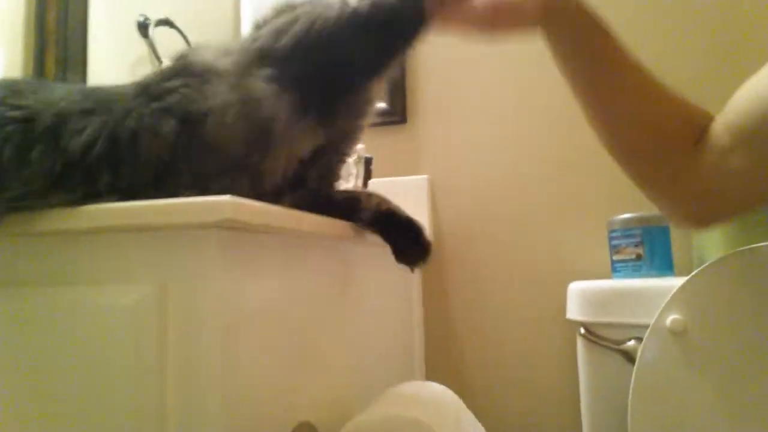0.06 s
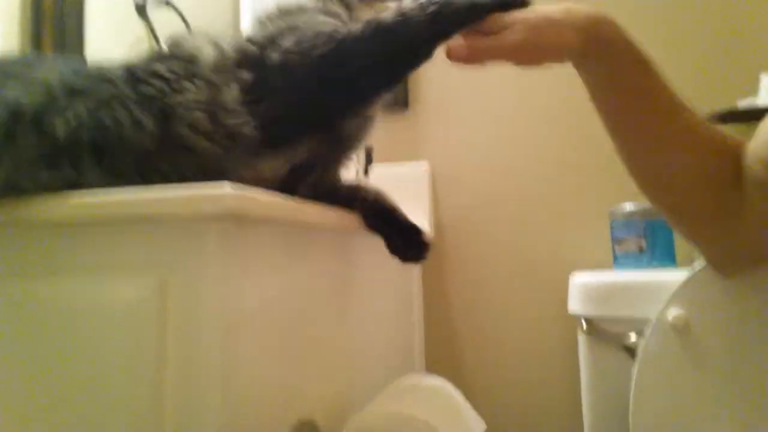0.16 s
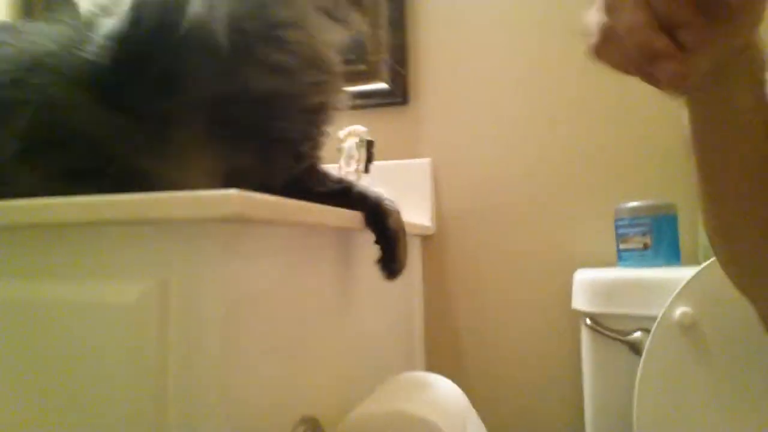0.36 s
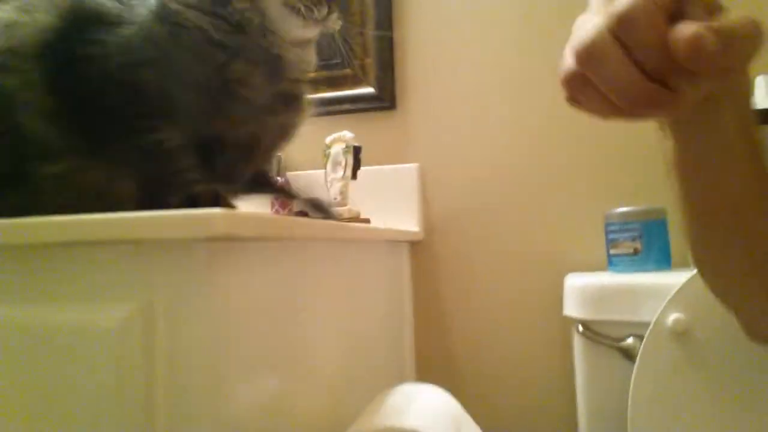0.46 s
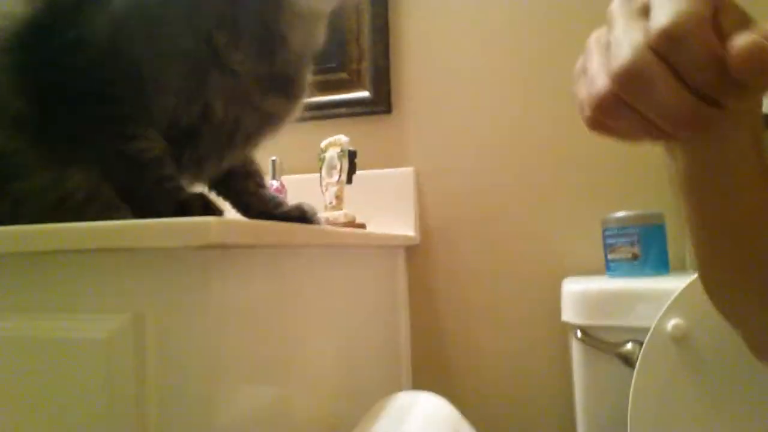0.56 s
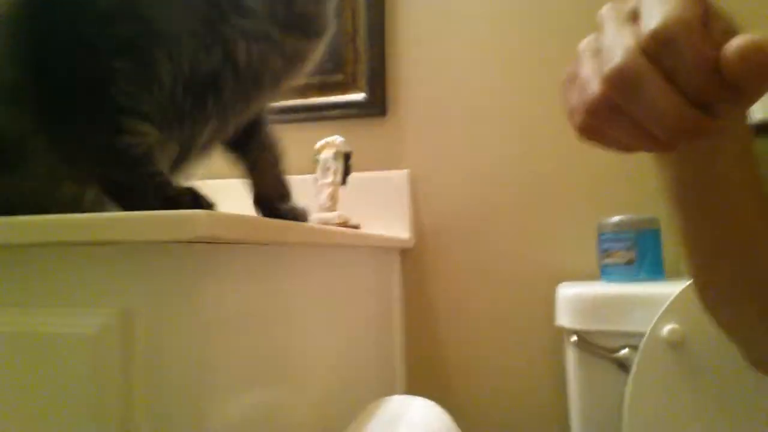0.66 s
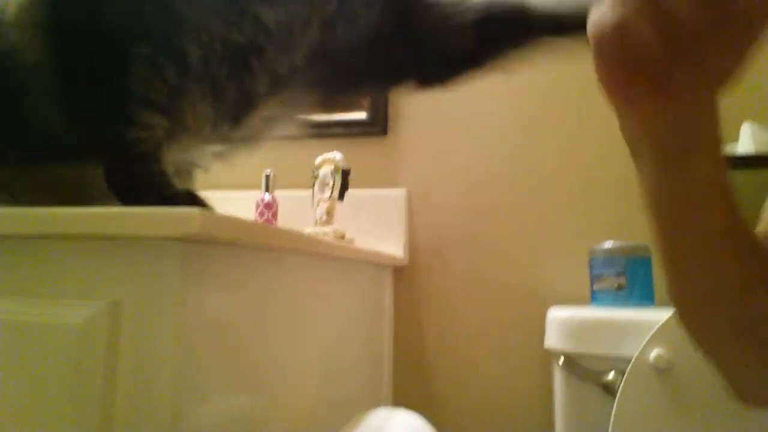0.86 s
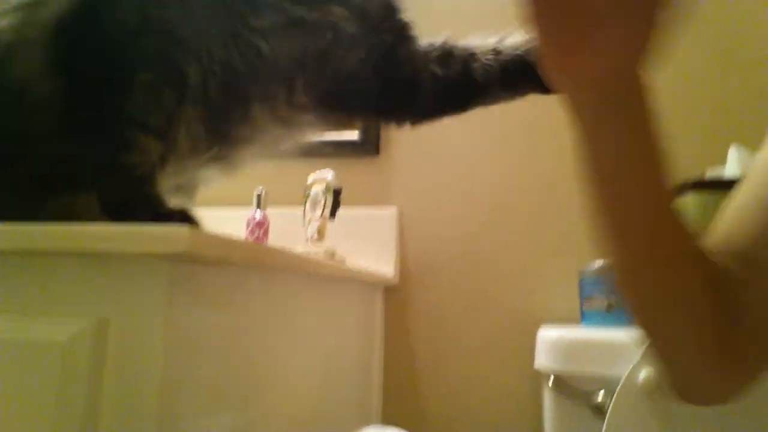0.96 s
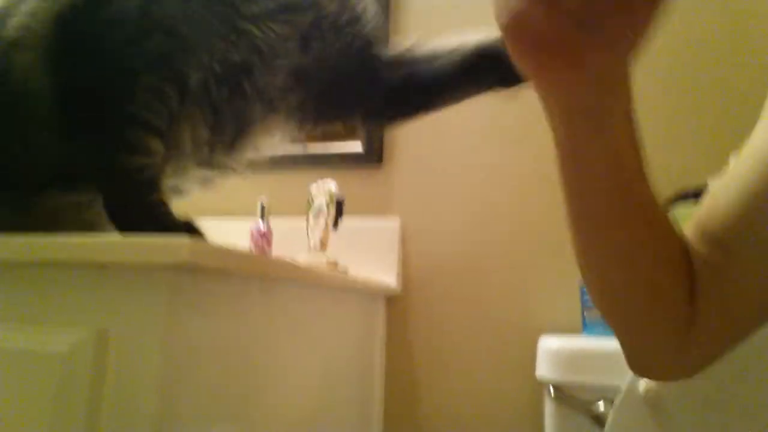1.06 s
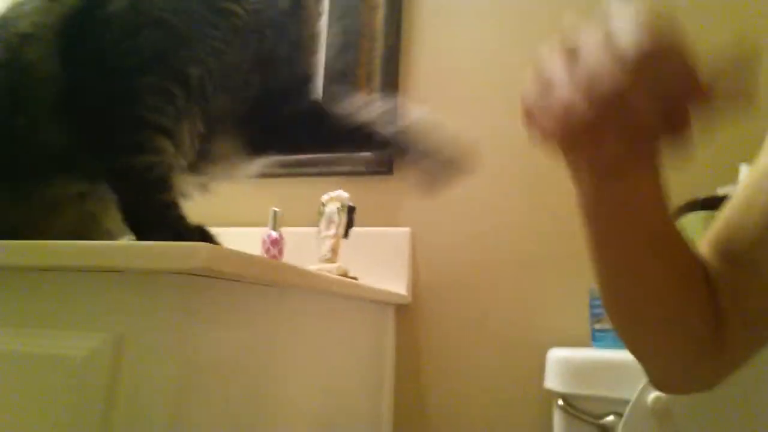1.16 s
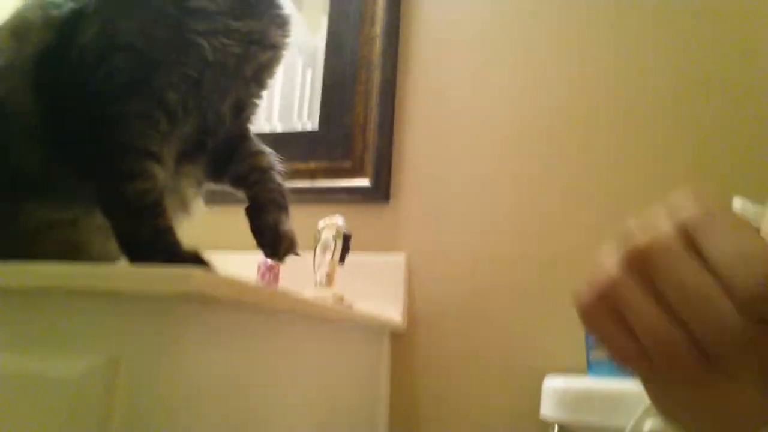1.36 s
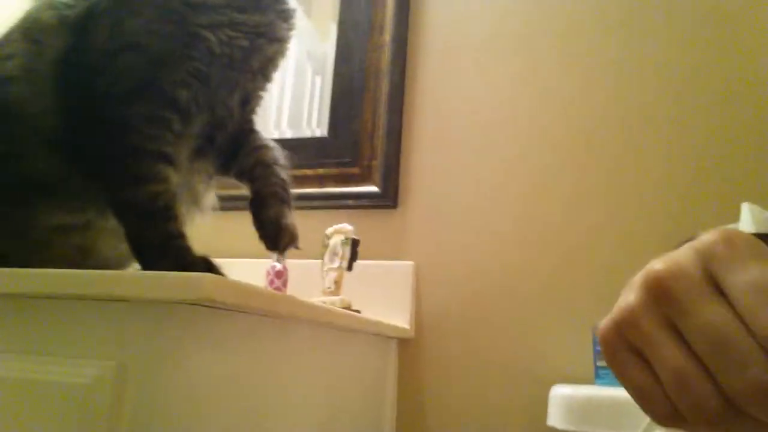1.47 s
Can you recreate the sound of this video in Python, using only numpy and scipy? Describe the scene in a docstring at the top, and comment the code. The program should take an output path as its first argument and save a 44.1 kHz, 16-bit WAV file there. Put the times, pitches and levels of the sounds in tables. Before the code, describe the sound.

A hard, hollow knock with a quick clatter as a cat swats in a bathroom.

```python
"""A cat spars with a hand on a bathroom cabinet, heard from a phone's stereo microphone in the same room.
First a claw ticks and a paw lands; then something hollow knocks hard against the cabinet and chatters,
and the small hard room rings with it. Near one second a soft swat follows, among padded steps that make
the cabinet boom, rustling fur and a sliding paw. Ventilation hums and hisses from start to end."""
import sys
import numpy as np
from scipy import signal
from scipy.fft import rfft, irfft
from scipy.io import wavfile

SR = 44100
rng = np.random.default_rng(int(sys.argv[2]) if len(sys.argv) > 2 else 0)


def master_out(mix):
    """Clip the mix to full scale and print it as 16-bit PCM to the path in sys.argv[1]."""
    frames = np.transpose(np.atleast_2d(mix))
    ceiling = np.clip(frames, -1, 1)
    pcm = np.round(ceiling * 32767).astype(np.int16)
    wavfile.write(sys.argv[1], SR, pcm)


N = 66150
T = np.arange(N) / SR
HZ = np.maximum(np.arange(N // 2 + 1) * SR / N, 1)
ALIKE_BELOW_HZ = 596  # below this, both sides of the microphone hear much the same


def knock():
    """A hollow body hits the cabinet: each contact feeds its modes and sets off a dense clatter."""
    # contacts, the loudest three being the knock: t/s, ring level/dB, clatter level/dB
    contacts = [(.2345, -18, -47), (.283, -25.5, -33), (0.332, 2, 2.5), (.3495, -10.5, -2),
                (.3645, -7, -2.5), (0.976, -32.5, -46)]
    # modes of the hollow body in the room: f/Hz, level/dB, t60/s, left-right/dB
    modes = [(256, -38, 0.52, 0.5), (336.5, -31, .33, 7), (362.4, -30.5, 0.32, 0.5), (443.4, -21, 0.35, 2),
             (732, -29.5, 0.43, 13.5), (790, -22.5, 0.4, -1), (832, -25.5, 0.49, 1), (854, -25, 0.18, -8),
             (876, -28, 0.23, 0), (930.6, -23.5, 0.36, -6.5), (1039, -29, 0.26, -2), (1029, -25, 0.28, 9.5),
             (1105, -35.5, 0.26, 6), (1356, -27, 0.27, 7), (1433, -22.5, 0.21, 0), (1510, -15, 0.074, 14),
             (1573, -35, 0.22, -21), (1873, -38, 0.21, 20), (2270, -32.5, 0.36, -6.5),
             (2653, -26.5, .25, 10), (2744, -35.5, .27, 9), (2896, -36, .22, 2), (3414, -41, 0.33, -19),
             (4200, -43, 0.25, -3), (5730, -30.5, 0.077, -5)]
    # spectrum of the dense resonances around them: f/Hz, level/dB
    clatter_colour = [(40, -35), (130, -7.5), (230, -33), (390, 2), (540, -15), (640, -12), (760, 1),
                      (980, -2.5), (1180, -7.5), (1530, 0.5), (1790, -15.5), (2020, -6), (2330, -11),
                      (2540, -10.5), (2720, -8), (3400, -13.5), (4500, -18), (6800, -22), (9500, -42),
                      (15000, -76)]
    phase_leads = 0.55 * rng.standard_normal(len(modes))
    start_turns = rng.random(len(modes))
    out = 0
    for (hz, db, t60, pan_db), lead, turn in zip(modes, phase_leads, start_turns):
        rise_s = 0.00088 + 1.6 / hz  # low modes swell more slowly
        swell = sum(undb(ring_db) * fall(start, rise_s, t60) for start, ring_db, _ in contacts)
        mic_phase = np.array([[lead], [-lead]]) * min(hz / ALIKE_BELOW_HZ, 2)
        tone = np.sin(2 * np.pi * (hz * T + turn) + mic_phase)
        out += undb(db) * pan(pan_db) * swell * tone
    for start, _, clatter_db in contacts:
        out += undb(clatter_db - 18.5) * room_burst(clatter_colour, start, rise_s=0.00093)
    return out


def paws():
    """Padded blows: the cabinet thumps and pings, the pad slaps, the fur brushes."""
    # blows: t/s, thump level/dB, slap level/dB, brush level/dB, brush left-right/dB
    blows = [(0.2312, -22.5, -53, -29, 2.5), (0.9731, -58.5, -41.5, -41, 3.5), (1.429, -62, -57, -61, -10)]
    # cabinet modes: f/Hz, level/dB, t60/s
    cabinet_modes = [(75, 0, 0.15), (113, 8.5, 0.085), (142, -2.5, .17), (1516, -10.5, 0.12)]
    # spectrum of the pad's slap: f/Hz, level/dB
    slap_colour = [(60, 5), (160, -10), (270, 0), (420, -0.5), (580, -11), (850, 3), (1300, -15.5),
                   (1650, -13), (2300, -26), (3500, -17), (15000, -40.5)]
    # spectrum of the fur's brush: f/Hz, level/dB
    brush_colour = [(300, 7), (1500, -13.5), (2800, -0.5), (4200, -4), (5800, 5.5), (7800, 1),
                    (10000, -15.5), (15000, -23)]
    rise_s, contact_s = 0.0032, 0.0053
    out = 0
    for start, thump_db, slap_db, brush_db, pan_db in blows:
        thump = sum(undb(db) * ring(start, hz, t60, rise_s=0.012) for hz, db, t60 in cabinet_modes)
        slap = room_burst(slap_colour, start, rise_s, direct_gain=undb(12.5), contact_s=contact_s)
        brush = room_burst(brush_colour, start, rise_s, direct_gain=undb(-0.5), contact_s=contact_s)
        out += undb(thump_db) * thump + undb(slap_db) * slap + undb(brush_db) * pan(pan_db) * brush
    return out


def claws():
    """Claws tick on a hard surface: a thin, bright snap and a short high ring."""
    # claw contacts: t/s, level/dB
    ticks = [(0.1882, -32.5), (0.2309, -40.5)]
    # spectrum of the snap: f/Hz, level/dB
    snap_colour = [(300, -13), (1500, -19), (2400, -2), (3600, -17), (5000, -9), (6600, 4), (8500, -15.5),
                   (15000, -27)]
    # modes a claw sets ringing: f/Hz, level/dB, t60/s
    modes = [(2380, -21, 0.11), (5670, -8, .1), (6400, -15, .2), (6780, -10, 0.4), (6800, -8, 0.41)]
    snap_s = 0.0013
    out = 0
    for start, tick_db in ticks:
        snap = room_burst(snap_colour, start, snap_s / 10, direct_gain=1, contact_s=snap_s)
        ping = 0
        for hz, db, t60 in modes:
            mic_phase = 2 * np.pi * rng.random((2, 1))
            ping += undb(db) * ring(start, hz, t60, snap_s, mic_phase)
        out += undb(tick_db) * pan(1.5) * (snap + ping)
    return out


def steps():
    """Padded footfalls stir only the lowest mode of the cabinet."""
    # paws set down: t/s, level/dB
    footfalls = [(0.907, -36.5), (1.007, -37), (1.06, -41), (1.147, -34), (1.203, -38), (1.36, -46),
                 (1.433, -37)]
    return sum(undb(db) * ring(start, hz=77.7, t60=0.28, rise_s=0.0089) for start, db in footfalls)


def clicks():
    """Tiny dry clicks as the cat moves; they sound close, with little room around them."""
    # clicks: t/s, level/dB
    events = [(.313, -49), (0.545, -38), (.8985, -62), (1.089, -41.5), (1.152, -48), (1.2163, -40.5)]
    # spectrum of a click: f/Hz, level/dB
    colour = [(500, -19), (2500, -8), (4200, 11), (7000, 7), (11000, -1), (15000, -5)]
    rise_s = 0.0009
    envelope = 0
    for start, db in events:
        direct = fall(start, rise_s, t60=0.018)
        room_tail = undb(-29) * fall(start, rise_s, t60=0.2)
        envelope += undb(db) * (direct + room_tail)
    return envelope * noise(undb(curve(colour)))


def shifting():
    """Fur rubs and the cabinet rumbles each time the cat shifts its weight."""
    # movements: middle t/s, half length/s, fur level/dB, rumble level/dB
    moves = [(0.008, 0.025, -49.5, -70), (0.077, 0.025, -42.5, -48.5), (0.115, 0.063, -44.5, -55),
             (.3, 0.11, -51, -48), (0.562, 0.066, -46.5, -43.5), (1.054, 0.03, -65, -48.5),
             (1.16, 0.066, -52.5, -63), (1.272, 0.12, -57, -57)]
    # spectrum of rubbing fur: f/Hz, level/dB
    fur_colour = [(100, -8), (280, -1), (800, -4.5), (1500, -12.5), (2500, -7.5), (4000, -12), (7300, -9),
                  (10000, -20), (15000, -27)]
    # spectrum of the cabinet's rumble: f/Hz, level/dB
    rumble_colour = [(22, -0.5), (48, -8), (78, -1), (115, -6.5), (160, 5.5), (300, -41), (900, -45)]
    fur = noise(undb(curve(fur_colour)))
    rumble = noise(undb(curve(rumble_colour)))
    return sum(hump(middle_s, half_s) * (undb(fur_db) * fur + undb(rumble_db) * rumble)
               for middle_s, half_s, fur_db, rumble_db in moves)


def paw_slide():
    """A paw slides on the counter with a faint, narrow swish."""
    return undb(-57.5) * hump(middle_s=1.24, half_s=0.15) * noise_band(hz=2110, width_hz=1000)


def ventilation():
    """Room tone: the ventilation's steady hiss, with a wavering hum and faint whines."""
    # narrow bands of hum and whine: f/Hz, width/Hz, level/dB
    bands = [(79, 5.9, -55.5), (267.6, 34, -61.5), (2840, 280, -63.5), (7060, 270, -63.5), (8000, 45, -74)]
    # spectrum of the moving air: f/Hz, level/dB
    air_colour = [(25, -19), (48, -9), (75, -2.5), (164, -4.5), (267, -6), (340, -12), (400, -15),
                  (800, -18), (1270, -22.5), (2100, -32.5), (2850, -29), (3600, -28.5), (5280, -27),
                  (7100, -24), (9000, -26.5), (11500, -33), (15500, -33.5)]
    hum = sum(undb(db) * noise_band(hz, width_hz) for hz, width_hz, db in bands)
    hiss = undb(-48) * noise(undb(curve(air_colour)))
    return hiss + hum


def room_burst(colour, start, rise_s, direct_gain=0, contact_s=1):
    """A contact at the microphone: optional direct sound, then a room tail dying octave by octave."""
    # decay of the bathroom: f/Hz, t60/s
    room_t60 = [(100, 0.55), (400, 0.37), (900, 0.51), (2000, 0.4), (4000, 0.41), (7000, 0.29),
                (14000, 0.45)]
    source = noise(undb(curve(colour)))
    spectrum = rfft(source)
    octaves_hz = np.geomspace(100, 12800, 8)
    out = direct_gain * source * fall(start, rise_s / 2, t60=contact_s * np.log(1000))
    for hz, selector in zip(octaves_hz, np.eye(len(octaves_hz))):
        band_gain = np.interp(np.log(HZ), np.log(octaves_hz), selector)
        out += irfft(spectrum * band_gain, N) * fall(start, rise_s, curve(room_t60, hz))
    return out


def noise(gain):
    """Stereo noise of rms 1 shaped by this spectrum; only the bass is alike on both sides."""
    # balance between the microphone's ports: f/Hz, left-right/dB
    port_balance = [(100, 2), (400, 2), (800, 0), (1400, 3), (2400, -1.5), (4400, 0), (8000, -10),
                    (15000, -4)]
    mid, side = np.exp(2j * np.pi * rng.random((2, len(HZ))))
    alike = 1 / (1 + (HZ / ALIKE_BELOW_HZ) ** 2)
    left_right = np.sqrt(1 + alike) * mid + np.sqrt(1 - alike) * side * np.array([[1], [-1]])
    x = irfft(left_right * gain * pan(curve(port_balance)), N)
    return x / np.sqrt(np.mean(x ** 2))


def noise_band(hz, width_hz):
    """Stereo noise gathered around one frequency."""
    return noise(1 / (1 + (2 * (HZ - hz) / width_hz) ** 2))


def ring(start, hz, t60, rise_s, phase=0):
    """One decaying mode."""
    return np.sin(2 * np.pi * hz * (T - start) + phase) * fall(start, rise_s, t60)


def fall(start, rise_s, t60):
    """Envelope that rises quickly and dies away by 60 dB in t60 seconds."""
    age = np.maximum(T - start, 0)
    return (1 - np.exp(-age / rise_s)) * np.exp(-np.log(1000) * age / t60)


def hump(middle_s, half_s):
    """Bell-shaped envelope of a smooth movement."""
    return np.exp(-((T - middle_s) / half_s) ** 2)


def curve(points, hz=HZ):
    """Read (f/Hz, value) points on a log-frequency axis."""
    points_hz, values = np.array(points, float).T
    return np.interp(np.log(hz), np.log(points_hz), values)


def pan(db):
    """Left and right gains for a left-right balance in dB."""
    return undb(np.array([[.5], [-.5]]) * db)


def undb(db):
    """Decibels to gain."""
    return 10 ** (np.asarray(db) / 20)


def scene():
    """Everything in the bathroom, as it reaches the microphone."""
    return knock() + claws() + clicks() + paws() + steps() + shifting() + paw_slide() + ventilation()


def record(dry):
    """The phone cuts the top of the treble steeply."""
    top_hz = 15550
    lowpass = signal.ellip(10, .2, 80, top_hz, fs=SR, output="sos")
    return signal.sosfilt(lowpass, dry)


dry = scene()
out = record(dry)
master_out(out)
```